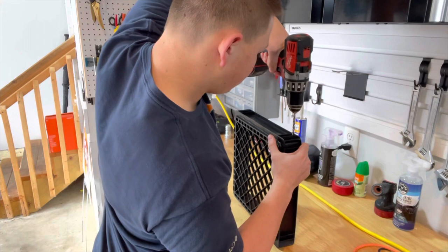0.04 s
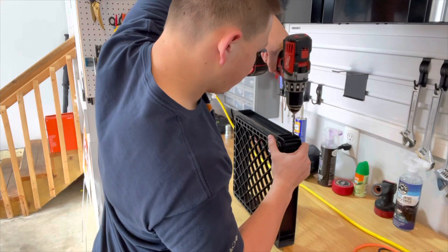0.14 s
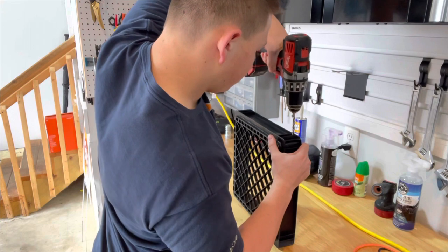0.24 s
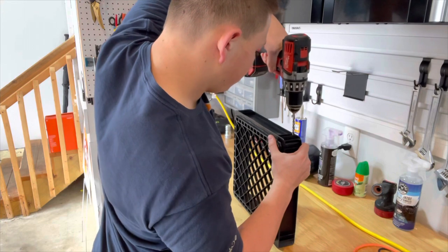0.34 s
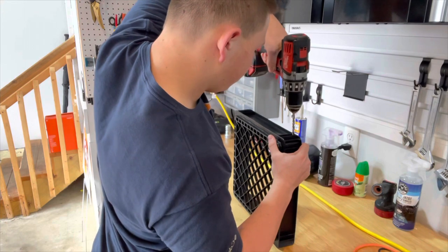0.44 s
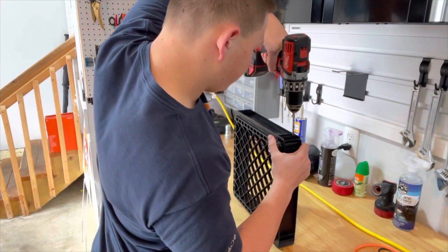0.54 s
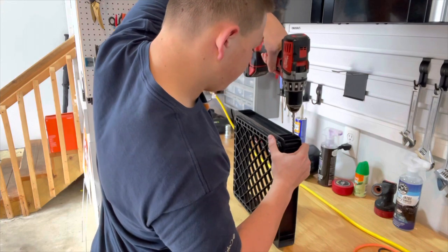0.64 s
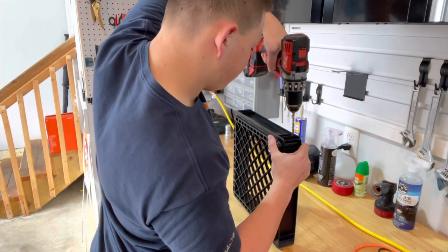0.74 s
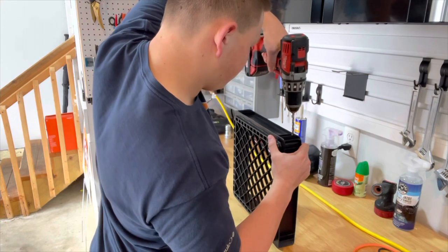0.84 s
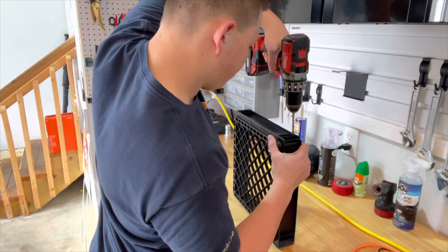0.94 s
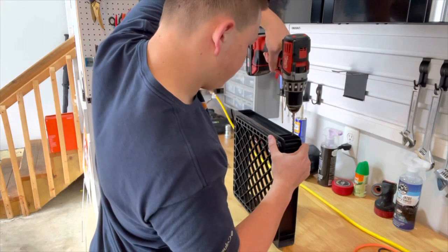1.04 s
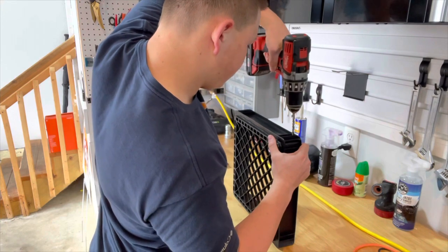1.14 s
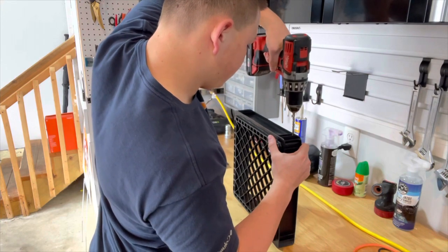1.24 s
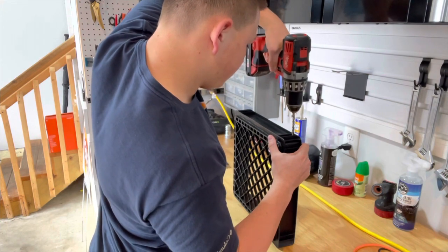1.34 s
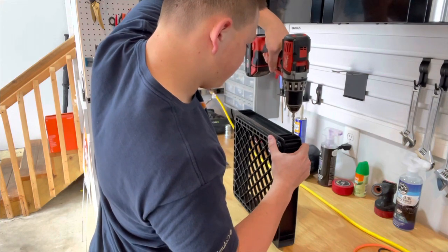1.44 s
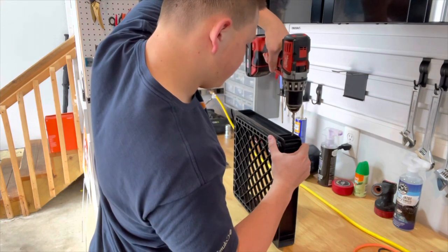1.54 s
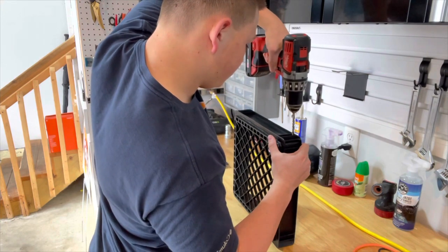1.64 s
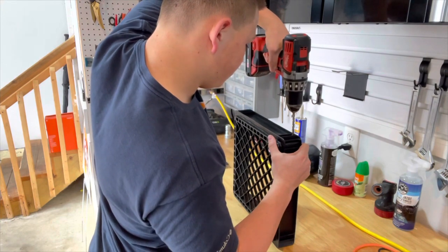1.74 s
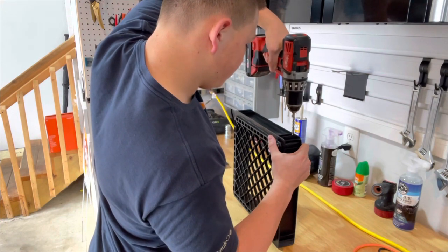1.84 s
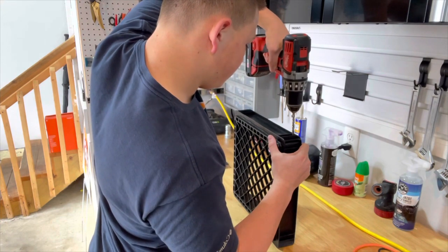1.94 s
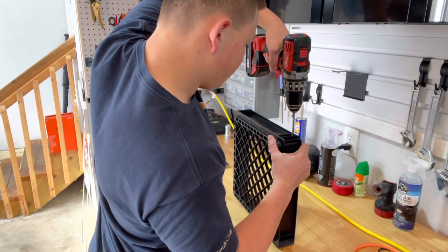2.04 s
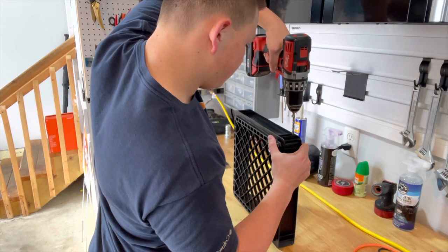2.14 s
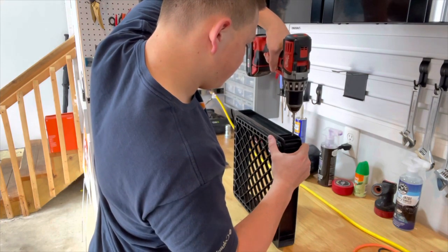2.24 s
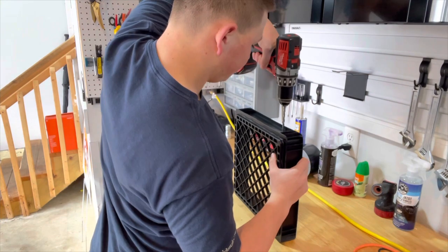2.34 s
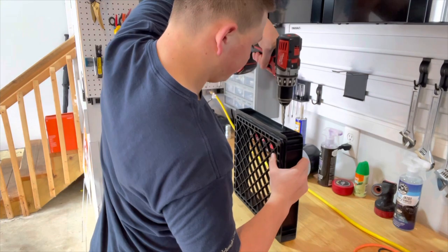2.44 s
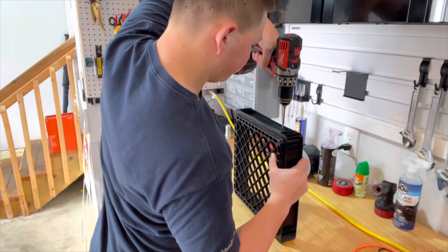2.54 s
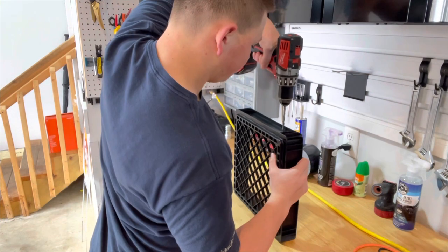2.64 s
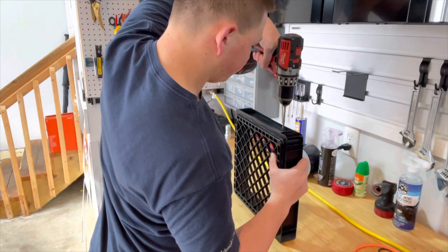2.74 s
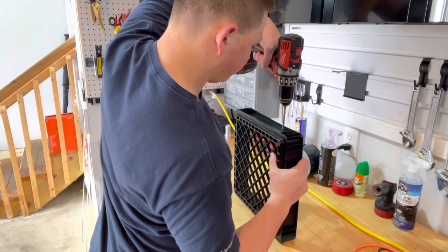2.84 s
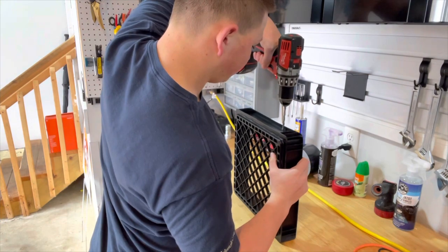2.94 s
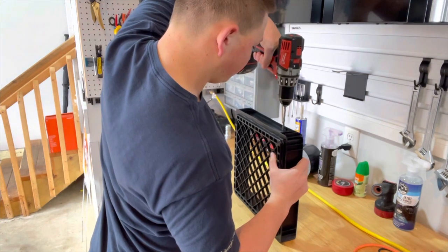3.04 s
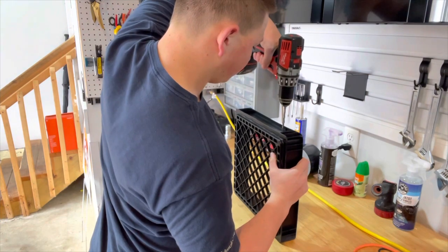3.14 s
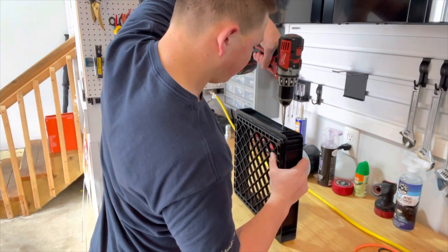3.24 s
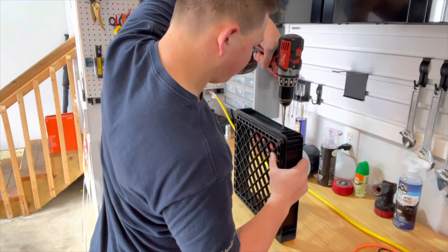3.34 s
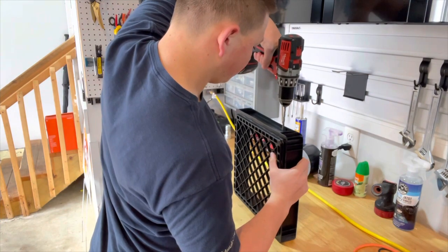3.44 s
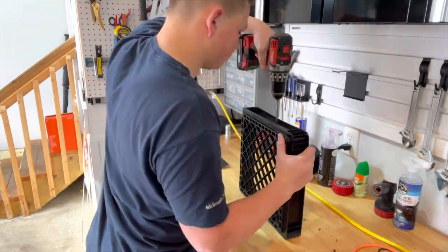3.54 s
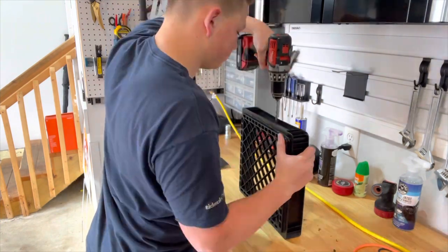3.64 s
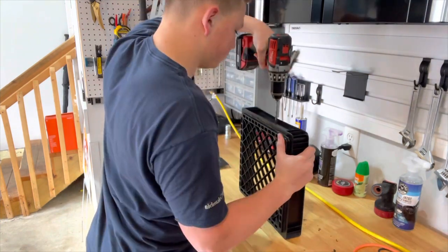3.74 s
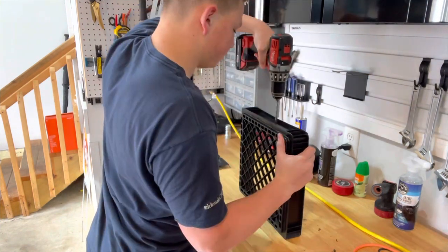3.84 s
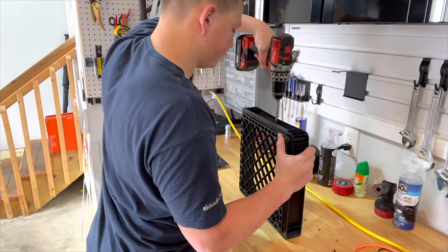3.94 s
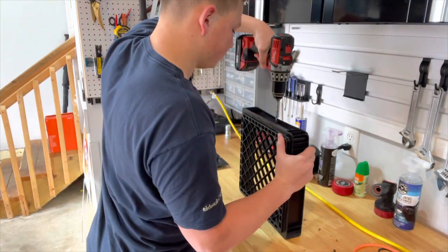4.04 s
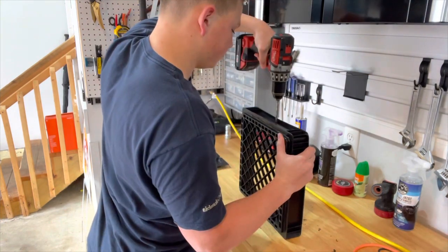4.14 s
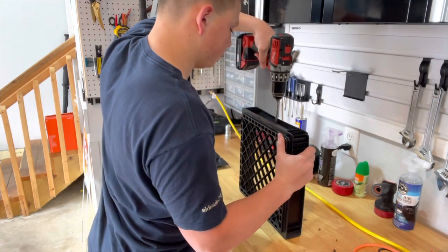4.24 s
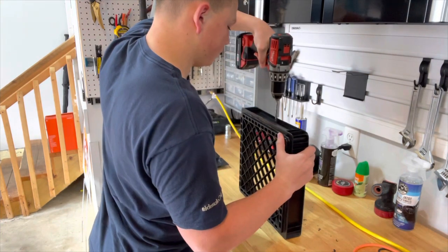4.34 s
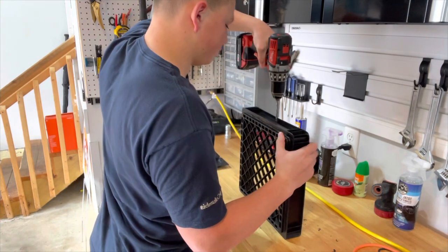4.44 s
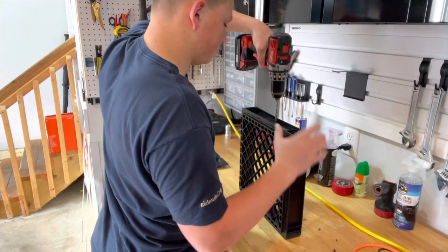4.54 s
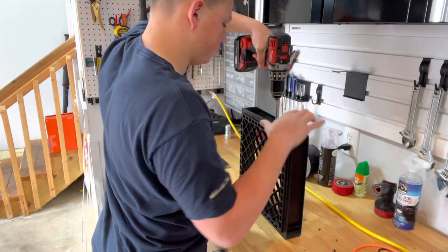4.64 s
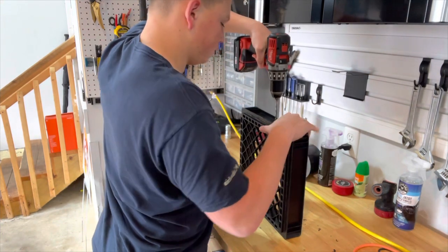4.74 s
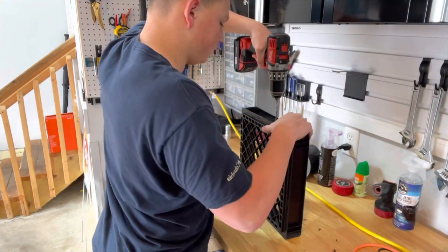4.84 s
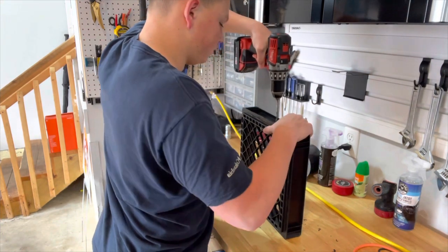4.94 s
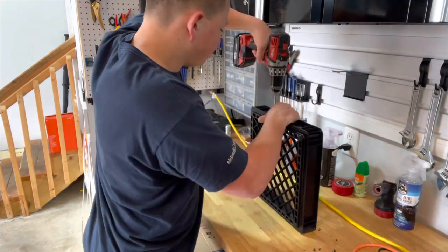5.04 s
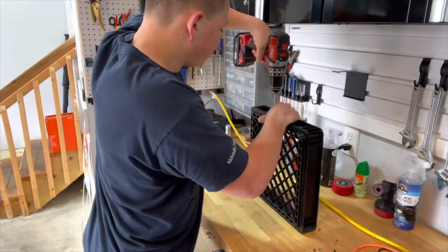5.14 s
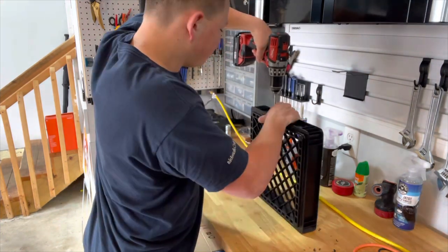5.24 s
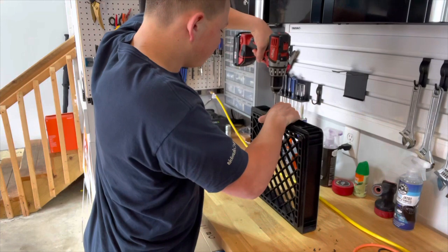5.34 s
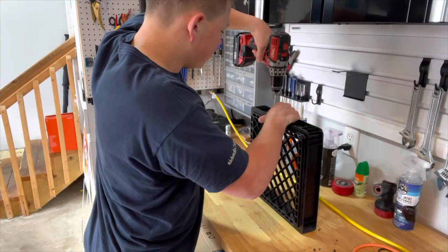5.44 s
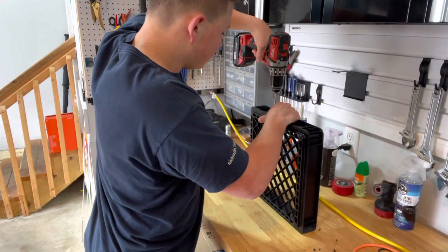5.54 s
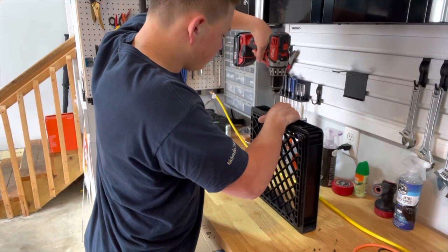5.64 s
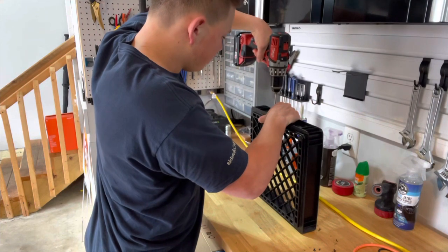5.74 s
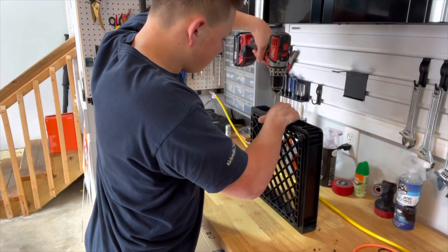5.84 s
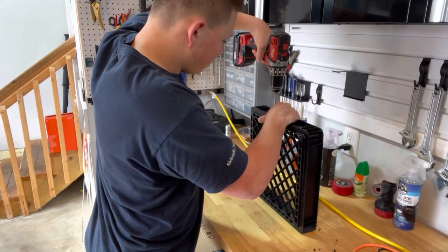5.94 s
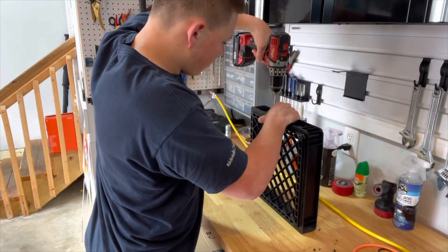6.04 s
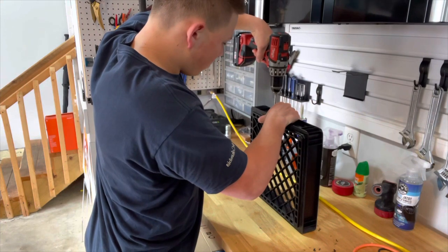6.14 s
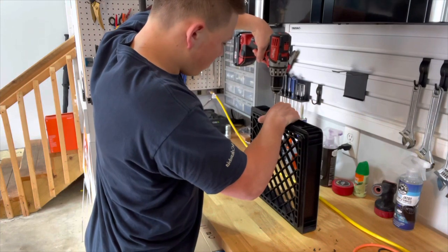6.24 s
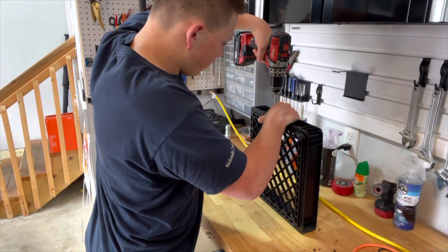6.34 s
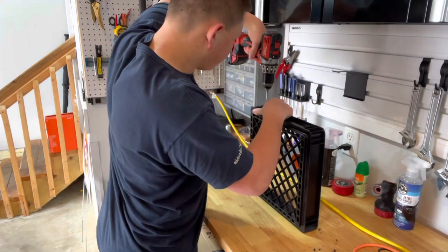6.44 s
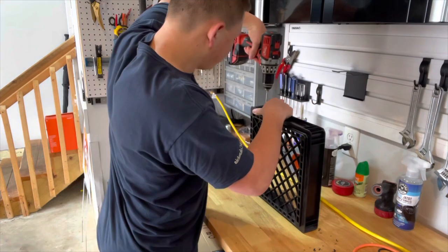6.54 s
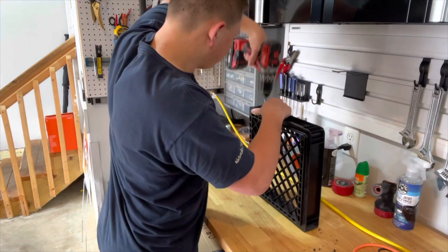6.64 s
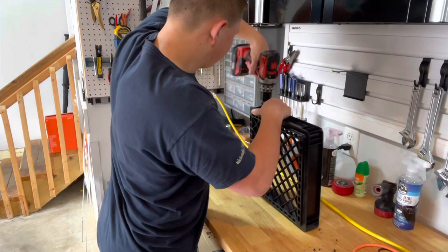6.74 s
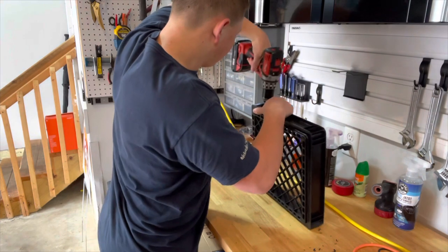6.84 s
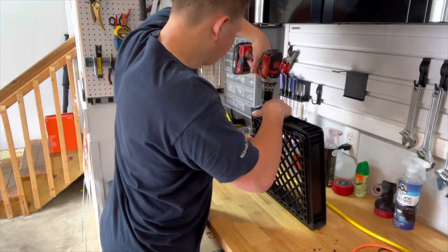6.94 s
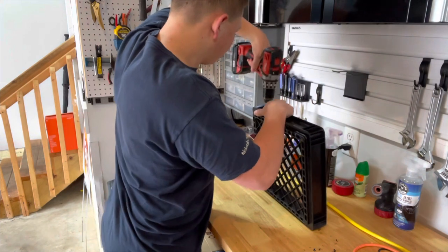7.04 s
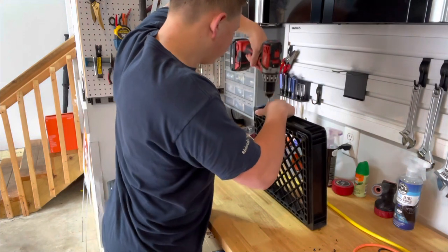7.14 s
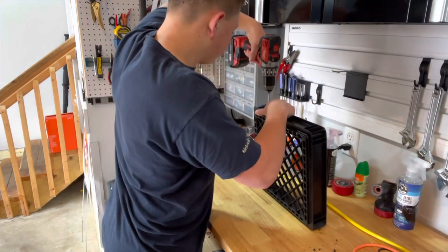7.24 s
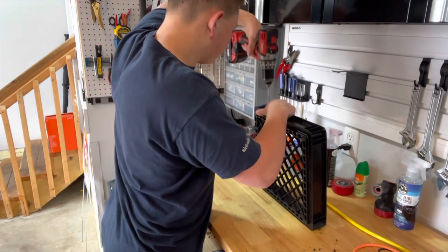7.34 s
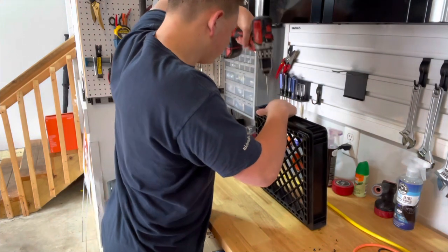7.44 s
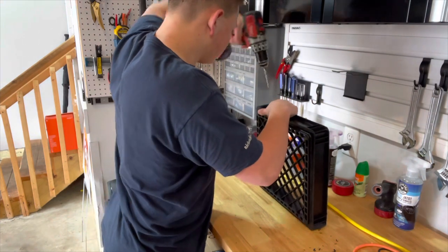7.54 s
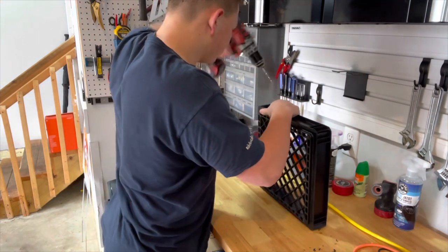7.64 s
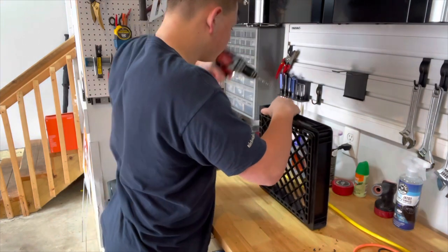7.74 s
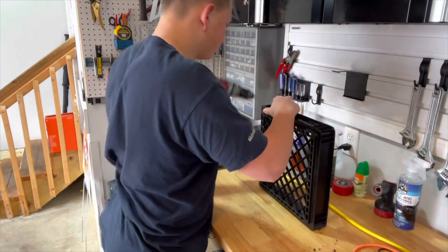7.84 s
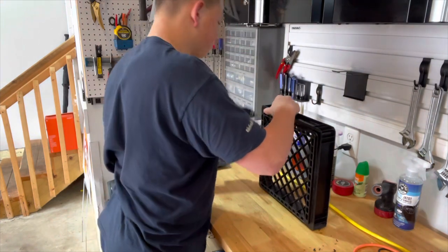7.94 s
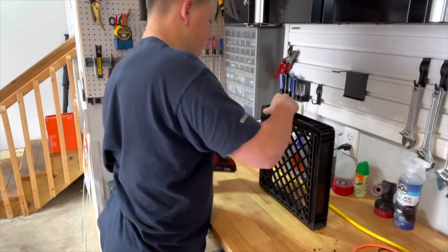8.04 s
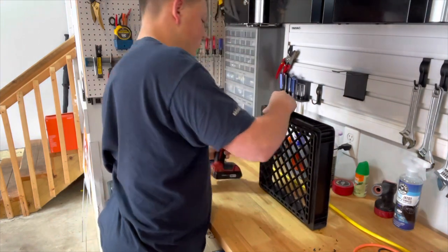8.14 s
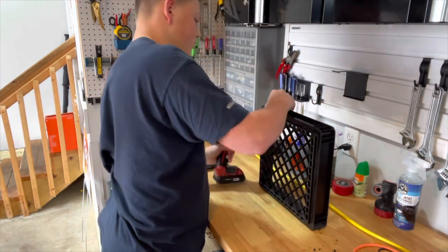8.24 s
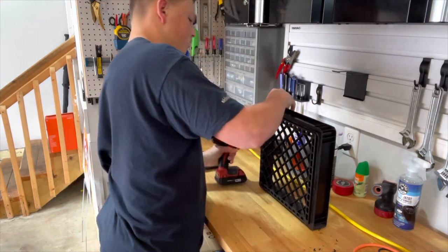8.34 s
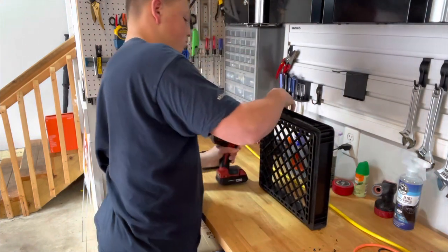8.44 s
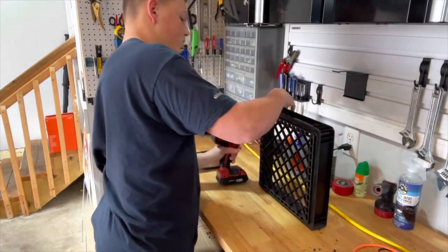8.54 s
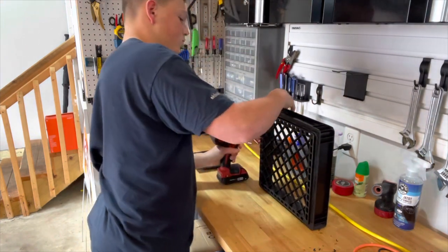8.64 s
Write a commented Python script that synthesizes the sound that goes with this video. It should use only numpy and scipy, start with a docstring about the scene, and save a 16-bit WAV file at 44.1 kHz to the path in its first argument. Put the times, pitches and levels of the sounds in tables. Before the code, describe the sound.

In a small, lightly echoing garage, a cordless drill starts with a low growl and faint high whistle, climbs unevenly, then runs as a loud bright rasp with gear whine. Five stretches are separated by split-second dips. Near the end the bit catches and bangs the plastic crate in rapid thuds; the motor stops, cloth rustles, and the drill lands on a wooden bench. Close stereo microphone.

```python
"""A drill growls and whines through five stretches of boring, knocks hard near the end, and is set down on wood.
It is a cordless drill in a plastic crate on a garage workbench: its hum and gear tones follow the shaft speed.
The rasp is noise struck tooth by tooth, and the speed controller whistles at low throttle.
The catching bit rings the crate's modes and the landing rings the bench's, with sleeve rustle and small ticks.
Sparse decaying reflections and quiet air form the garage; the whole level dips briefly between stretches."""
import sys
import numpy as np
from scipy import signal
from scipy.fft import rfft, next_fast_len
from scipy.io import wavfile
from scipy.ndimage import map_coordinates

SR = 44100
rng = np.random.default_rng(int(sys.argv[2]) if len(sys.argv) > 2 else 0)


def wrap_up_sound(samples):
    """Save the sound to the file named by the first command line argument, as 16-bit audio."""
    columns = np.atleast_2d(samples).T
    # keep every value between -1 and 1, then stretch to whole-number steps
    tamed = np.clip(columns, -1, 1)
    steps = np.round(tamed * 32767).astype(np.int16)
    wavfile.write(sys.argv[1], SR, steps)


N = 383229
TIME = np.arange(N) / SR
EDGE_HZ = 15800  # upper band limit

# the five stretches of running, one row each, at the usual speed and midway through:
# rasp_db, drift_db_per_s (of rasp and whine), mesh_db, shake_db (passed to the crate)
RUNS = [(-29.5, 0, -4, -4), (-23, -0.3, 1, 3), (-23.5, -2.5, 3, 6), (-23, 0.1, 0, -2), (-25, -3, -1, -1.5)]
# brief dips in level between the stretches: centre_s, half_length_s
DIPS = [(2.374, 0.034), (3.573, 0.031), (5.006, 0.03), (6.472, 0.033)]


def amp(db):
    """Converts level to amplitude: 20 dB is a factor of ten."""
    return 10 ** (np.asarray(db) / 20)


def unit(x):
    """Normalises power: scales to rms 1."""
    return x / np.sqrt(np.mean(abs(x) ** 2) + 1e-20)


def read(points, hz):
    """Interpolates a curve on a log-frequency axis, close to the ear's pitch scale."""
    f, value = np.transpose(points)
    return np.interp(np.log(hz + 1), np.log(f + 1), value)


def humps(peaks, hz):
    """Resonance: the dB that bell-shaped peaks or hollows add at these frequencies."""
    return sum(rise / (1 + (2 * (hz - f) / width) ** 2) for f, width, rise in peaks)


def colour(x, spectrum, peaks=()):
    """Linear filtering: weights the spectrum by a curve with resonances on top; rms 1."""
    size = next_fast_len(len(x))
    hz = np.fft.rfftfreq(size, 1 / SR)
    gain = amp(read(spectrum, hz) + humps(peaks, hz))
    return unit(np.fft.irfft(rfft(x, size) * gain, size)[:len(x)])


def wander(t, rate):
    """Random modulation of rms 1: straight lines between random values, rate of them a second."""
    knots = rng.standard_normal(16384)
    return unit(np.interp(t * rate, np.arange(len(knots)), knots))


def swell(t, start, length, attack_s=.05, release_db_per_s=130):
    """Envelope: a linear rise, a hold until the length is over, then exponential decay."""
    rise = np.clip((t - start) / attack_s, 0, 1)
    return rise * amp(-release_db_per_s * np.maximum(t - start - length, 0))


def patchy(x, depth_db, width_hz=170, length_s=0.1393):
    """Time-varying filtering: the spectrum ripples as the drill moves in the hand; rms 1."""
    hz, t, z = signal.stft(x, SR, nperseg=1024)
    cells = np.meshgrid(hz / width_hz, t / length_s, indexing="ij")
    field = map_coordinates(rng.standard_normal((512, 128)), cells, order=1, mode="mirror")
    return unit(signal.istft(z * amp(depth_db * unit(field)), SR, nperseg=1024)[1][:len(x)])


def add(mix, s, sound):
    """Superposition: mixes a sound in at time s."""
    part = mix[..., round(s * SR):][..., :sound.shape[-1]]
    part += sound[..., :part.shape[-1]]


def quiet_air(air_db=-55):
    """Diffuse background: coloured noise, partly shared between the ears and partly independent."""
    # spectrum of the quiet garage: pitch_hz, level_db_per_hz (relative)
    air_spectrum = [(15, -48.5), (25, -17.5), (48, -7.5), (103, -8), (146, -19), (231, -17.5), (293, -20.5),
                    (450, -28.5), (879, -26.5), (1090, -30.5), (2930, -51), (4150, -53.5), (6000, -59),
                    (15000, -66.5)]
    common, left, right = (colour(rng.standard_normal(N), air_spectrum) for _ in range(3))
    return amp(air_db) * (0.5 * common + 0.77 * np.array([left, right]))


def controller(flutter_db=0.7, start_s=0.323, length_s=2.3, switching_hz=7623):
    """Magnetostrictive-like whistle: switched motor current makes the windings sing until full trigger."""
    # the switching tone, then its octave: level_at_start_db, level_at_end_db
    whistle = [(-52, -38.5), (-54, -57)]
    progress = np.clip((TIME - start_s) / length_s, 0, 1)
    envelope = swell(TIME, start_s, length_s, attack_s=0.039, release_db_per_s=198)
    envelope *= amp(flutter_db * wander(TIME, rate=14))
    tones = np.zeros(N)
    for harmonic, (first_db, last_db) in enumerate(whistle, start=1):
        level = amp(first_db + (last_db - first_db) * progress)
        tones += np.sqrt(2) * level * np.sin(2 * np.pi * harmonic * switching_hz * TIME)
    return envelope * tones


def drill_run(index):
    """Order-locked tones at multiples of shaft speed, plus noise pulsed by teeth striking and sliding."""
    # motor speed under trigger and load, one curve a stretch: time_s, speed_turns_per_s
    speeds = [
        [(0.34, 30.0), (0.48, 57.0), (0.6, 86.0), (0.75, 96.5), (0.8, 87.0), (0.85, 110.0), (0.92, 129.75),
         (1.07, 150.0), (1.29, 163.75), (1.5, 114.5), (1.72, 141.75), (1.96, 148.5), (2.21, 161.25),
         (2.37, 166.0)],
        [(2.38, 142.5), (2.58, 209.0), (2.74, 227.0), (2.9, 233.45), (3.57, 235.5)],
        [(3.58, 249.25), (3.74, 252.0), (3.94, 259.0), (4.29, 261.25), (4.6, 242.5), (5.0, 234.75)],
        [(5.01, 293.8), (5.84, 293.75), (6.47, 290.5)],
        [(6.48, 291.0), (6.63, 287.0), (6.69, 283.0), (6.82, 282.5), (6.96, 250.75), (7.03, 247.25),
         (7.14, 261.5), (7.32, 286.75), (7.49, 243.25)],
    ]
    # weaker low tones: order (multiple of motor speed), then level_db against the rasp in each stretch
    shaft_orders = [(0.331, -42, -46, -37, -30.5, -34.5), (1.0, -23.5, -21.5, -25.5, -23, -21.5),
                    (2.0, -25, -22, -24.5, -22, -21.5), (4.0, -21.5, -34, -24, -16, -20.5),
                    (4.22, -36, -26, -27, -25.5, -41), (5.0, -46, -25, -21, -17.5, -19.5),
                    (6.0, -25.5, -28.5, -20, -25, -20), (8.0, -37, -23, -28, -31.5, -39)]
    # mesh overtones and the planet gears' tones between them: order (multiple of motor speed)
    gear_orders = [9.47, 10.46, 15, 18.95, 19.57, 20, 21, 22, 25, 27.81, 28.42, 30, 35, 40, 41, 45, 50]
    # their relative levels, one row a stretch: level_db of each gear order
    gear_levels = [(-58, -66, -57.5, -57, -69, -42, -62, -54.5, -50, -65, -62, -40.5, -42.5, -43.5, -50, -47, -43),
                   (-54.5, -46, -41.5, -40.5, -41, -34, -46, -47, -51.5, -36, -33.5, -40.5, -36, -34.5, -54.5, -55.5, -50.5),
                   (-47, -56, -46.5, -43, -40, -34.5, -36.5, -54.5, -37.5, -49, -51, -35.5, -54, -38.5, -58, -59.5, -45),
                   (-39.5, -50, -53, -35, -42.5, -38, -57.5, -51, -46, -46, -44.5, -44.5, -56, -55, -59.5, -61, -58),
                   (-42, -48, -47, -33.5, -39.5, -40, -54, -58, -36.5, -51, -44, -35, -55, -53, -57.5, -58, -49.5)]
    # resonances of the shell: pitch_hz, width_hz, rise_db
    shell = [(1860, 200, 9), (2940, 180, 6), (3300, 100, 3.5), (3620, 120, 5.5), (4030, 150, 7),
             (4450, 120, 4.5), (5020, 170, 5.5), (5360, 110, 5), (6520, 220, 4), (7640, 280, 5.5)]
    # resonances and hollows of the held housing, one group a stretch: pitch_hz, width_hz, rise_db
    housing = [
        [(1330, 240, 4.5), (4890, 870, 4.5), (3540, 280, 5), (3780, 300, 1), (7600, 4500, 1.5), (704, 400, 1.5)],
        [(5100, 940, 6), (6670, 530, 3.5), (3900, 1000, 2), (1450, 150, 2), (5860, 268, -2), (7100, 320, -2.5),
         (2900, 500, -1)],
        [(4910, 410, 7), (6900, 900, 1), (2460, 245, 4.5), (3120, 250, -2), (1550, 160, 1.5), (2170, 200, -2.5),
         (3400, 200, 1.5)],
        [(5260, 780, 8.5), (2830, 400, 6.5), (1420, 420, 3), (5850, 280, -4.5), (2086, 260, -1.5),
         (4100, 110, -1)],
        [(4990, 930, 4.5), (2780, 510, 3.5), (1104, 1000, 1.5), (3120, 200, 0), (2200, 400, -1),
         (4300, 500, 2.5)],
    ][index]
    # narrow resonances of the motor's mount: pitch_hz, width_hz, rise_db
    mount = [(353, 37, 7.5), (492.3, 23, 17), (646, 27, 17.5), (697, 23, 9.5), (763, 144, 22.5),
             (867, 56, 18)]
    # narrow resonances of the gear case: pitch_hz, width_hz, rise_db
    gear_case = [(1235, 50, 16), (1363, 78, 15.5), (1588, 170, 12), (1940, 260, 12), (2090, 120, 6),
                 (2323, 136, 14.5), (2468, 42, 12), (2551, 90, 14), (2650, 40, 5.5), (2842, 50, 12),
                 (2940, 66.6, 14)]
    # resonances of the bearing's seat: pitch_hz, width_hz, rise_db
    bearing_seat = [(553, 63, 20.5), (616, 27, 13), (840, 137, 13)]
    # the bearing's tone against the rasp, away from resonance: level_db in each stretch
    bearing_levels = [-29.5, -37.5, -42, -32, -43]
    # spectrum of the gearbox rasp: pitch_hz, level_db_per_hz (relative)
    rasp_spectrum = [(60, -26.5), (150, -11.5), (370, -19.5), (520, -14.5), (950, -11.5), (1400, -4),
                     (2150, -9.5), (3000, -8), (4600, -2), (6200, 0), (8000, -1.5), (10000, -2.5),
                     (12000, -4.5), (15800, -5)]

    hum_order, mesh_order, bearing_order = 3, 10, 5.22
    hum_db, base_mesh_db = -62, -53.5  # away from any resonance
    rasp_gain_db, shaft_gain_db, gear_gain_db, buzz_gain_db = 1.5, -3.5, -2.0, -27
    play_rad, speed_jitter = 0.29, 0.00078
    gear_flutter_db, mesh_flutter_db, unsteady_db = 4.0, 3.0, 0.57
    grit_db, throb_db, tooth_depth, turn_depth = 0.68, 0.46, 0.2, 0.091
    start_s, brake_s, unload_s = 0.12, 0.047, 0.079  # the tones fade first as the trigger is let go

    edges = [speeds[0][0][0]] + [dip[0] for dip in DIPS] + [speeds[-1][-1][0]]
    t = np.arange(edges[index], edges[index + 1], 1 / SR)
    speed = np.interp(t, *np.transpose(speeds[index]))
    angle = 2 * np.pi * np.cumsum(speed * (1 + speed_jitter * wander(t, rate=70))) / SR
    octaves = np.log2(speed / np.median(speed))

    # the gears follow the speed (dB per octave) and the slightly unsteady push of the hand
    usual_rasp, drift, mesh_db, shake_db = RUNS[index]
    effort_db = 4 * octaves + drift * (t - t.mean()) + unsteady_db * wander(t, rate=9.7)
    # they are 5 dB quieter until the bit first bites
    effort_db -= 5 * (1 - swell(t, 0.76, TIME[-1], attack_s=0.051))
    rasp_db = usual_rasp + effort_db
    # the whine gains on the rasp as the speed rises
    whine_db = gear_gain_db + effort_db + 8.5 * octaves
    # the low tones weaken steeply below the stretch's median speed
    imbalance_db = 31 * np.minimum(octaves, 0)
    # hum and mesh tone fade below 141 turns a second
    slow_db = 13 * np.log2(np.minimum(speed / 141, 1))
    offsets = {}

    def tone(order, db, waver_db, play=0):
        """Phase-locked sine of one shaft order, wavering with load and blurred by gear play in radians."""
        offset = 2 * np.pi * offsets.setdefault(order, rng.random())
        blur = play * wander(t, rate=110) if play else 0
        level = amp(db + waver_db * wander(t, rate=45))
        return np.sqrt(2) * level * np.sin(order * angle + offset + blur)

    def ringing_db(order):
        """Swept resonance: a gear tone swells as it glides through the shell or housing; mean power 1."""
        return 20 * np.log10(unit(amp(humps(shell + housing, order * speed))))

    hum = tone(hum_order, hum_db + humps(mount, hum_order * speed) + slow_db, waver_db=0.8)
    bearing_db = rasp_db + bearing_levels[index] + humps(bearing_seat, bearing_order * speed)
    hum += tone(bearing_order, bearing_db, waver_db=2.5)
    for order, *levels in shaft_orders:
        hum += tone(order, rasp_db + imbalance_db + levels[index] + shaft_gain_db, waver_db=1.8)
    # while the bit bites, it passes the motor's once-a-turn shake into the crate, up to a limit
    biting_db = 20 * np.log10(chatter(t)[0] + 1e-9)
    hum += tone(1, np.minimum(biting_db, rasp_db - 24) + shake_db, waver_db=3.0)

    mesh_level_db = base_mesh_db + mesh_db + humps(gear_case, mesh_order * speed) + slow_db
    gears = tone(mesh_order, mesh_level_db, mesh_flutter_db)
    for order, db in zip(gear_orders, gear_levels[index]):
        gears += tone(order, whine_db + ringing_db(order) + db, gear_flutter_db, play_rad)
    # no two teeth are alike, which puts a faint buzz on other multiples of the speed
    for order in range(7, 46):
        if order % 5 and order not in gear_orders:
            buzz_db = rasp_db + buzz_gain_db + read(rasp_spectrum, order * speed)
            gears += tone(order, buzz_db, gear_flutter_db, play_rad)

    # each tooth contact is a burst of uneven strength; the planet gears make the bursts throb
    teeth = (1 + tooth_depth * np.cos(mesh_order * angle)) * (1 + turn_depth * np.cos(angle))
    force = teeth * amp(grit_db * wander(t, rate=1100) + throb_db * wander(t, rate=71))
    grind = colour(force * rng.standard_normal(len(t)), rasp_spectrum, housing)
    rasp = amp(rasp_db + rasp_gain_db) * patchy(grind, depth_db=1.97)

    to_end = edges[-1] - t  # seconds until the motor finally stops
    running = np.minimum((t - edges[0]) / start_s, 1) ** 2 * np.minimum(to_end / brake_s, 1) ** .5
    driven = running * np.minimum(to_end / unload_s, 1)
    layers = np.array([hum * driven, gears * driven, rasp])
    return t[0], layers * running * signal.windows.tukey(len(t), .008)


def chatter(t):
    """Friction envelopes: how strongly the bit rumbles and scrapes at these times."""
    # spells of chatter in the plastic: start_s, length_s, rumble_db, scrape_db
    spells = [(0.793, 0.04, -65, -53), (4.376, 0.16, -50, -65), (4.51, 0.31, -46, -49),
              (5.144, 1, -52.5, -63), (6.592, 0.16, -29, -44.5), (6.827, 0.34, -36.5, -47),
              (7.11, 0.16, -36.5, -36.5)]
    levels = np.zeros((2, len(t)))
    for start, length, *level_db in spells:
        levels += amp(level_db)[:, None] * swell(t, start, length, attack_s=0.018, release_db_per_s=106)
    return levels


def cutting(slips_per_s=2500):
    """Stick-slip friction: random slips of the flutes shake the crate and scrape the hole."""
    # low rumble of the crate: pitch_hz, level_db_per_hz (relative)
    rumble_spectrum = [(30, 14.5), (70, 1), (130, 8), (185, -0.5), (245, 9), (320, 7.5), (480, -25),
                       (1000, -25)]
    # scraping in the hole: pitch_hz, level_db_per_hz (relative)
    scrape_spectrum = [(250, -28.5), (520, -16.5), (800, 5), (1300, 9.5), (2000, -1), (4000, -13.5),
                       (9000, -51)]
    rumble, scrape = chatter(TIME)
    slips = rng.standard_normal(N) * (rng.random(N) < slips_per_s / SR)
    return rumble * colour(slips, rumble_spectrum) + scrape * colour(slips, scrape_spectrum)


def knocks(rows, modes, crack, crack_decay_s):
    """Modal impact: a soft half-sine push rings damped modes, plus a short noisy crack of the contact."""
    t, out = np.arange(SR) / SR, np.zeros(N)
    ring = sum(amp(db - 60 * t / t60) * np.sin(2 * np.pi * hz * t) for hz, db, t60 in modes)
    for s, thump_db, contact_s, crack_db, dull_hz in rows:
        push = np.sin(np.pi * np.minimum(t / contact_s, 1))
        thump = signal.fftconvolve(ring, push / push.sum())[:SR] / 2
        add(out, s, amp(thump_db) * thump)
        low_pass = signal.butter(2, min(dull_hz, EDGE_HZ), fs=SR)
        grains = signal.lfilter(*low_pass, rng.standard_normal(SR))
        add(out, s, amp(crack_db) * colour(grains, crack) * np.exp(-t / crack_decay_s))
    return out


def catches():
    """Impulsive excitation: the bit catches and jerks the crate, ringing its modes."""
    # the jerks: time_s, thump_db (relative), contact_s, crack_db, dull_above_hz
    jerks = [(6.624, -15.5, 0.0011, -21, 900), (6.632, -26, 0.0025, -24.5, 900),
             (6.651, -30.5, 0.0027, -25, 4500), (6.663, -31, 0.0028, -14, 5000),
             (6.669, -30, 0.0039, -18.5, 5010), (6.677, -24.5, 0.0014, -17, 4000),
             (6.685, -15, 0.002, -25, 1500), (6.701, -24.5, 0.0022, -34, 2000),
             (6.722, -23.5, 0.0039, -30, 1800), (6.733, -8, 0.0036, -24, 503),
             (6.749, -12.5, 0.0046, -30.5, 800), (6.761, -15, 0.0046, -29, 500),
             (6.773, -9.5, 0.0053, -29, 400), (6.907, -19.5, 0.0014, -22.5, 1000),
             (6.915, -13, 0.0032, -27.5, 600), (6.922, -16, 0.0019, -28.5, 1200)]
    # modes of the crate: pitch_hz, level_db, t60_s
    crate_modes = [(48.4, -11, 0.2), (91, -2, 0.1), (127, -21, 0.05), (156.3, -6.5, 0.16),
                   (257, -2.5, 0.094), (337, -1, 0.07), (486, 8, 0.049), (670, -13, 0.046)]
    # spectrum of the crack: pitch_hz, level_db_per_hz (relative)
    crack_spectrum = [(150, 4), (450, 11.5), (1400, 6.5), (2200, 2), (3900, 2.5), (7000, -5), (15000, -24)]
    return knocks(jerks, crate_modes, crack_spectrum, crack_decay_s=0.0087)


def sleeve(rub_db=-2, swish_db=-1):
    """Friction noise: cloth slides on cloth in small uneven rubs, and swishes in one narrow band."""
    # rustles as the arm comes down: start_s, length_s, level_db (relative)
    rustles = [(7.68, 0.18, -68), (8.0, 0.11, -70), (8.33, 0.11, -70), (8.52, 0.17, -69)]
    # spectrum of the rubbing cloth: pitch_hz, level_db_per_hz (relative)
    cloth_spectrum = [(100, 7), (260, 6), (600, -21.5), (1200, 7), (2000, 5), (3800, 5), (7000, -0.5),
                      (15000, -9)]
    # swishes as the arm swings: start_s, length_s, level_db (relative)
    swings = [(7.764, 0.094, -72), (8.0, 0.32, -78)]
    # narrow spectrum of the swish: pitch_hz, level_db_per_hz (relative)
    swish_spectrum = [(2500, -35), (3500, -10), (3950, 0), (4350, -8), (4800, -32)]

    def envelope(rows):
        """Superposed envelopes of all the spells."""
        return sum(amp(db) * swell(TIME, start, length, attack_s=0.033, release_db_per_s=140)
                   for start, length, db in rows)

    rubs = envelope(rustles) * amp(rub_db + 1.9 * wander(TIME, rate=98))
    rubbing = rubs * colour(rng.standard_normal(N), cloth_spectrum)
    swishing = envelope(swings) * amp(swish_db) * colour(rng.standard_normal(N), swish_spectrum)
    return rubbing + swishing


def small_noises(tick_decay_s=0.0085):
    """Transients and a free tone: noise ticks of the plastic grip, and a faint metal ring on the bench."""
    # ticks as the hand shifts on the drill: time_s, level_db
    ticks = [(7.712, -55), (8.506, -62.5), (8.514, -60), (8.644, -58)]
    # spectrum of a tick: pitch_hz, level_db_per_hz (relative)
    tick_spectrum = [(300, -15), (1000, 4), (3000, 2), (6000, 0), (9000, -4), (15000, -9)]
    # something metal ringing after the landing: start_s, length_s, pitch_hz, level_db
    metal_ring = (8.41, 1, 5208, -69)
    t = np.arange(SR // 4) / SR
    start, length, hz, db = metal_ring
    envelope = amp(db) * swell(TIME, start, length, attack_s=0.03, release_db_per_s=110)
    out = np.sqrt(2) * envelope * np.sin(2 * np.pi * hz * TIME)
    for s, tick_db in ticks:
        tick = colour(rng.standard_normal(len(t)), tick_spectrum) * np.exp(-t / tick_decay_s)
        add(out, s, amp(tick_db) * tick)
    return out


def landings():
    """Impulsive excitation: the drill lands and rocks on the bench, ringing its wooden modes."""
    # the contacts: time_s, thump_db (relative), contact_s, clack_db, dull_above_hz
    contacts = [(8.273, -40.5, 0.0018, -38.5, 12000), (8.283, -23.5, 0.0027, -30.5, 12100),
                (8.295, -22.5, 0.0022, -54, 4000), (8.309, -25, 0.0035, -53, 4000),
                (8.352, -38.5, 0.0014, -50, 5000), (8.385, -32, 0.0038, -60, 3000),
                (8.513, -45.5, 0.0015, -55, 3000), (8.648, -24.5, 0.0088, -55, 1500),
                (8.659, -25, 0.0097, -72, 1500)]
    # modes of the bench: pitch_hz, level_db, t60_s
    bench_modes = [(48.3, -2, 0.53), (71.4, -8, 0.04), (101, 3.5, 0.13), (156.6, 6, 0.061),
                   (188.5, -3, 0.094), (242, 0.5, 0.18), (282, -8.5, 1), (309.4, -1, 0.5), (352, -12, 0.41),
                   (393, -31, 0.25)]
    # spectrum of the clack: pitch_hz, level_db_per_hz (relative)
    clack_spectrum = [(200, 11), (500, 8.5), (900, 0), (1450, -6), (1830, 1), (2300, -5), (2900, -5),
                      (3700, -9.5), (5500, -21), (15000, -23)]
    return knocks(contacts, bench_modes, clack_spectrum, crack_decay_s=0.0096)


def garage(x):
    """Reverberation: sparse reflections of random sign for each ear, each band dying at its own rate."""
    # reverberation time of the garage: pitch_hz, t60_s
    decay_times = [(100, 0.18), (500, 0.69), (2000, 0.62), (5000, 0.54), (9000, 0.46), (15000, 0.18)]
    present = rng.random((2, SR)) < 3000 / SR  # 3000 reflections a second
    after_gap = np.arange(SR) > .003 * SR
    taps = rng.choice([-1., 1.], (2, SR)) * present * after_gap
    hz, t, z = signal.stft(taps, SR, nperseg=256)
    decay = amp(-60 * t / read(decay_times, hz)[:, None])
    tail = signal.istft(z * decay, SR, nperseg=256)[1]
    tail = tail / np.linalg.norm(tail, axis=1, keepdims=True)
    return signal.fftconvolve(x[None], tail, axes=1)[:, :N]


def scene():
    """Superposition of direct and reverberant sound: drill, crate and bench in the garage's quiet air."""
    drill = np.zeros((3, N))
    for index in range(len(RUNS)):
        add(drill, *drill_run(index))
    hum, gears, rasp = drill
    crate = cutting() + catches()
    handling = landings() + sleeve() + small_noises()
    # levels sent to the room, in dB
    to_room = amp(-7) * rasp + amp(-12) * hum + amp(-9) * gears + amp(-7) * crate + amp(-9) * handling
    direct = amp(-2) * rasp + amp(-1.2) * (hum + gears) + controller() + crate + handling
    dips = np.prod([np.minimum(abs(TIME - s) / half, 1) for s, half in DIPS], axis=0)
    return (direct + garage(to_room) + quiet_air()) * dips


def record(dry, low_cut_hz=42):
    """Mid-side width and a treble phase lead of left over right, within low and high band limits."""
    # gain of the left-right difference: pitch_hz, level_db
    width = [(50, -11), (130, -3.5), (300, 3), (1500, 1.5), (5800, 3.5), (6600, -2.5), (7800, -24.5),
             (9400, -10), (10400, -60), (11900, -53), (12800, -9.5), (15000, -17)]
    # phase by which left leads: pitch_hz, lead_rad
    lead = [(7300, 0), (8300, .65), (9300, 1.6), (10300, 3.1), (12000, 3.2), (13000, 4.9), (13700, 6.28)]
    hz = np.fft.rfftfreq(N, 1 / SR)
    high_pass = signal.butter(8, low_cut_hz, "high", fs=SR, output="sos")
    left, right = rfft(signal.sosfilt(high_pass, dry), axis=1)
    mid = (left + right) / 2
    side = (left - right) / 2 * amp(read(width, hz))
    pair = np.fft.irfft([(mid + side) * np.exp(1j * read(lead, hz)), mid - side], N)
    low_pass = signal.firwin(511, EDGE_HZ, window=("kaiser", 9), fs=SR)
    return signal.oaconvolve(pair, low_pass[None], "same")


dry = scene()
out = record(dry)
wrap_up_sound(out)
```